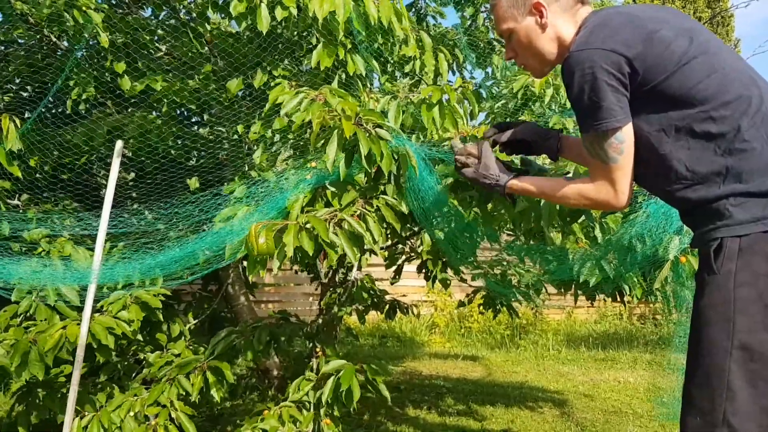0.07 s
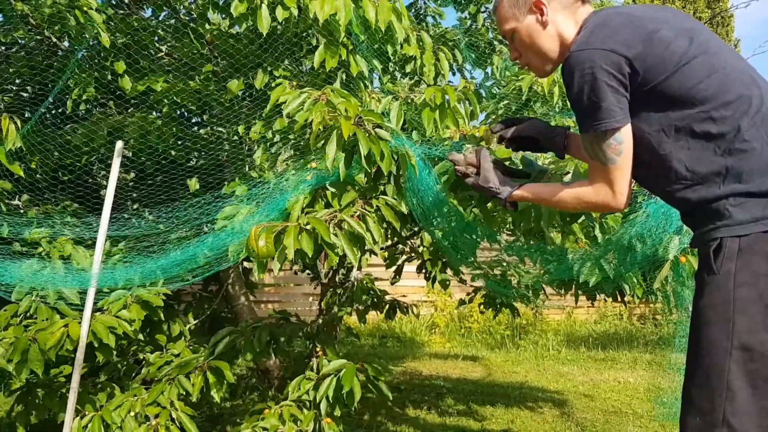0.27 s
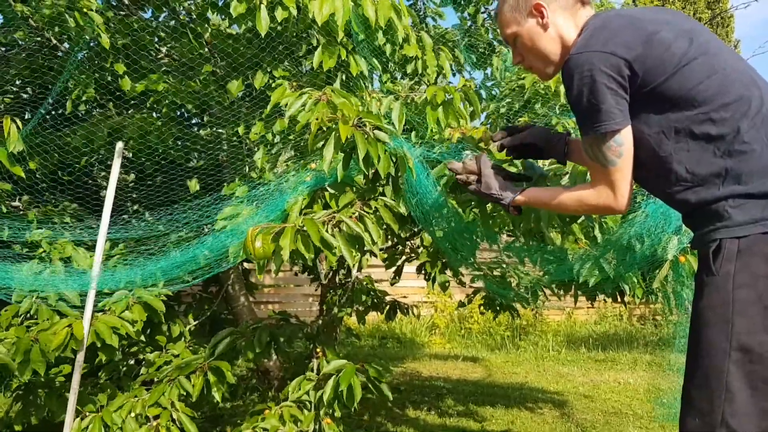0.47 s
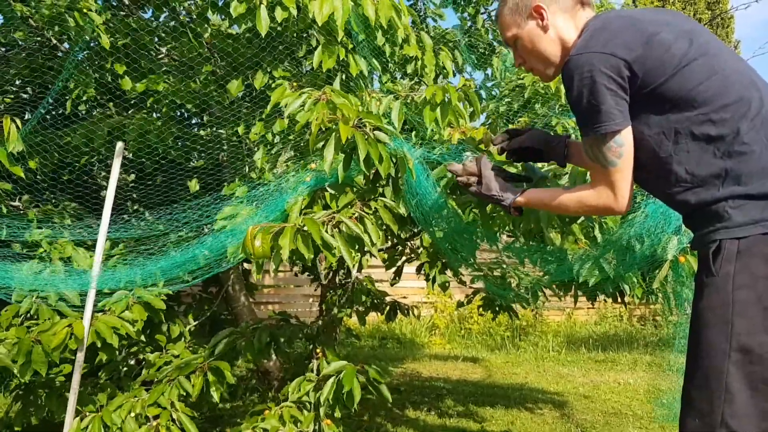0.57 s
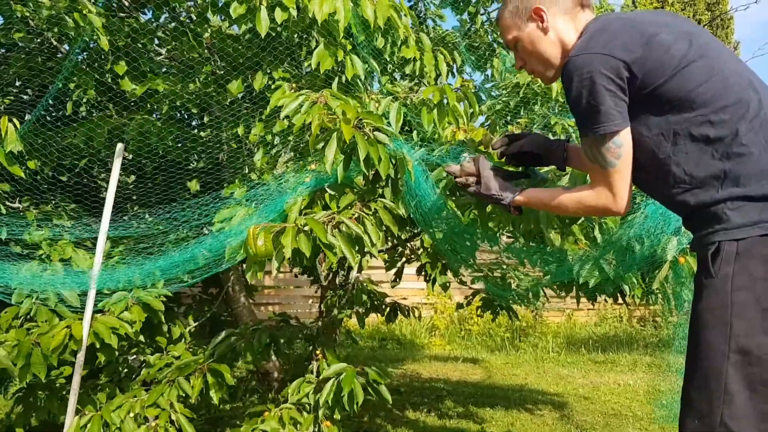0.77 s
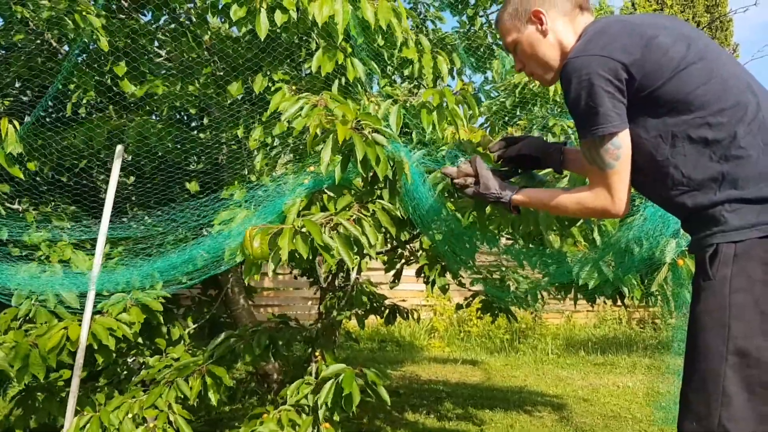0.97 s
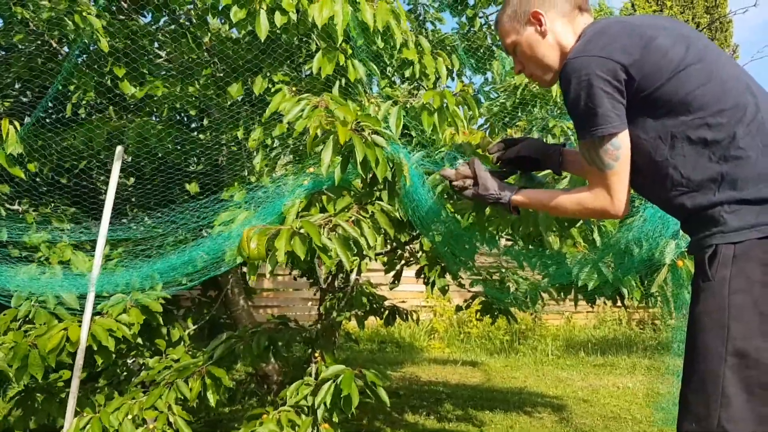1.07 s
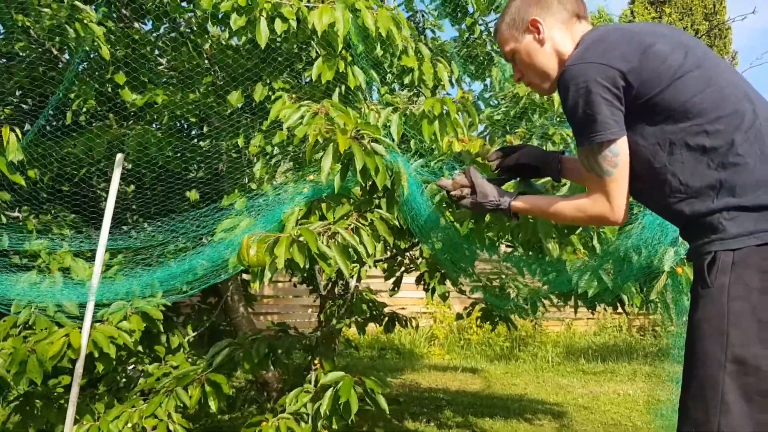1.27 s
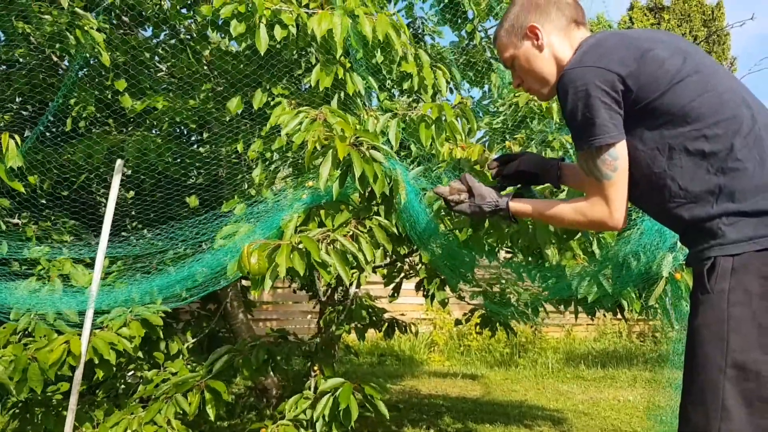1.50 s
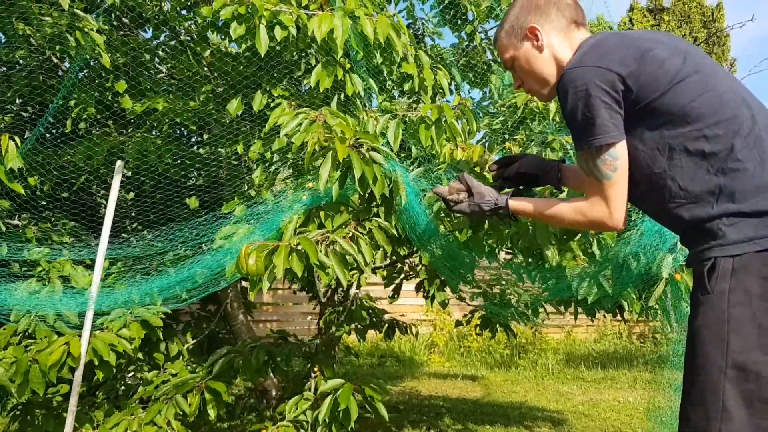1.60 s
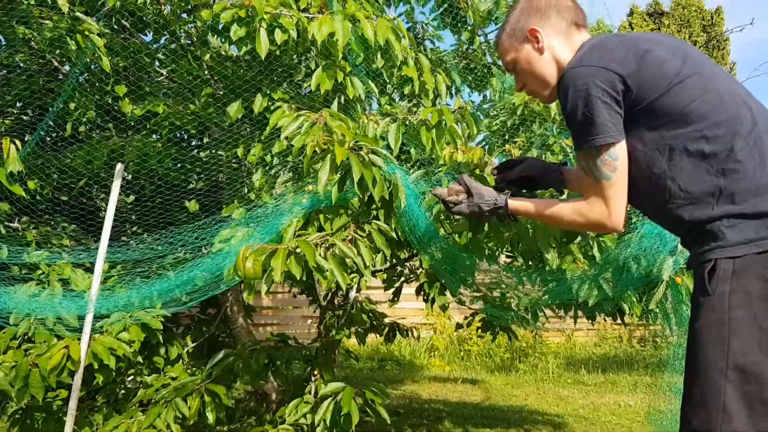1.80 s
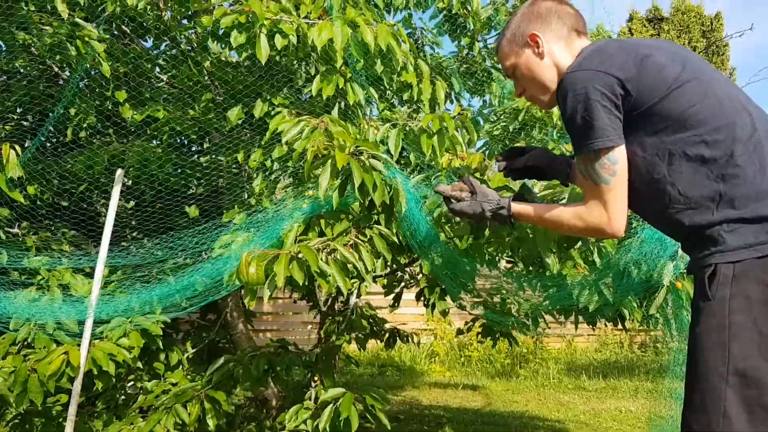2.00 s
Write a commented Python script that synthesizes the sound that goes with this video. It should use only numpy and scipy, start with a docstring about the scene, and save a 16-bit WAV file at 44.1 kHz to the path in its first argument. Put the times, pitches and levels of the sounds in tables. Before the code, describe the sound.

A bird squawks twice, harsh and raspy, at about 0.2 and 0.6 seconds, each call lasting under a fifth of a second with a short echo. Before them, a faint earlier echo fades. Handled netting rustles and bumps softly until about 1 second and again from 1.5 to 1.8. A twig ticks faintly near 1.1 seconds. Quiet leaf hiss and low air rumble on the microphone continue throughout.

```python
"""The echo of a squawk dies away over faint leaf hiss and the rumble of air on the microphone.
Then the bird, caught in garden netting, squawks twice. The two sides of its syrinx sound at once and
modulate each other, so sum tones glide through the throat resonances over a rasp. Trees and a fence
scatter the calls. The net rustles and bumps softly as it is handled, and a twig ticks."""
import sys
import numpy as np
from scipy import signal
from scipy.fft import rfft, irfft, next_fast_len
from scipy.io import wavfile

SR = 44100
rng = np.random.default_rng(int(sys.argv[2]) if len(sys.argv) > 2 else 0)


def store_wav(level_fs):
    """Save 16-bit WAV to argv[1]."""
    pcm = np.round(np.clip(np.atleast_2d(level_fs), -1, 1) * 32767)
    wavfile.write(sys.argv[1], SR, pcm.T.astype(np.int16))


N = 90404
TIME = np.arange(N) / SR
ECHO_DB, ECHO_DELAY_S, ECHO_T60_S = -20, 0.019, 0.31
GARDEN_LIKENESS, NEAR_PAN_DB = 0.067, 4.5

# Vocal effort, one table per squawk. Each row: time in seconds, voice drive in dB, rasp drive in dB.
VOCAL_EFFORT = [
    [(.19, -35.5, -74), (.2, -32.5, -62.5), (.21, -26.5, -53.5), (.232, -21.5, -48.5), (.25, -18, -42),
     (.272, -17, -40), (.287, -21, -36), (.3, -15.5, -36), (.316, -16.5, -38.5), (.338, -15, -35),
     (.358, -19, -37), (.371, -20, -45), (.379, -30, -49.5)],
    [(.567, -34.5, -68), (.578, -28.5, -62.5), (.595, -21, -51), (.625, -20.5, -42.5), (.635, -20, -38),
     (.656, -15.5, -48), (.668, -19, -43), (.679, -23, -39), (.695, -17.5, -49), (.705, -19, -43.5),
     (.716, -19.5, -39.5), (.724, -24, -47), (.733, -36, -43)],
]
# The hollow between the two main resonances, one row per squawk.
# Each row: centre in Hz, half width in Hz, gain in dB.
NOTCHES = [(3760, 160, -31), (3437, 400, -31.5)]


def from_db(db):
    """Amplitude grows tenfold for every 20 dB."""
    return 10 ** (np.asarray(db) / 20)


def rms_one(x):
    """Dividing by the rms gives a signal unit power."""
    return x / np.sqrt(np.mean(x ** 2) + 1e-20)


def in_time(rows):
    """Linear interpolation gives each column of a curve at every sample."""
    seconds, *columns = np.transpose(rows)
    return [np.interp(TIME, seconds, column) for column in columns]


def at_hz(points, hz):
    """A spectrum is interpolated on a logarithmic frequency axis."""
    knots_hz, values = np.transpose(points)
    return np.interp(np.log(np.maximum(hz, 1)), np.log(knots_hz), values)


def filtered(x, response):
    """A linear filter multiplies the spectrum by its response, a function of Hz."""
    size = next_fast_len(x.shape[-1] + SR // 4)
    hz = np.arange(size // 2 + 1) * SR / size
    return irfft(rfft(x, size) * response(hz), size)[..., :x.shape[-1]]


def coloured(x, spectrum):
    """Zero-phase filtering imposes a spectral envelope, given in rows of Hz and dB."""
    return filtered(x, lambda hz: from_db(at_hz(spectrum, hz)))


def drift(corner_hz):
    """Low-passed noise wanders smoothly, here with unit rms."""
    pole = np.exp(-2 * np.pi * corner_hz / SR)
    return rms_one(signal.lfilter([1], [1, -2 * pole, pole * pole], rng.standard_normal(N)))


def stereo_noise(spectrum, likeness):
    """The ratio of side noise to mid noise sets the correlation, or likeness, of two channels."""
    mid, side = rms_one(coloured(rng.standard_normal((2, N)), spectrum))
    return mid + np.sqrt((1 - likeness) / (1 + likeness)) * np.array([side, -side])


def panned(x, pan_db):
    """A level difference between the channels leans a sound to the left."""
    return x * from_db([[pan_db / 2], [-pan_db / 2]])


def dying(start, t60):
    """Exponential decay loses 60 dB every t60 seconds, down to a floor of -120 dB."""
    return (TIME >= start) * from_db(-60 * np.clip((TIME - start) / t60, 0, 2))


def scatter(x, delay, t60):
    """Many small reflections act as a convolution with decaying noise, different in each channel."""
    # Colour of the reflections. Each row: frequency in Hz, gain in dB.
    echo_colour = [(1500, 9.5), (2700, 3), (4600, -2.5), (8000, -2), (14000, 4)]
    tails = rng.standard_normal((2, N)) * dying(delay, t60)
    tails = coloured(rms_one(tails) / np.sqrt(N), echo_colour)
    return signal.fftconvolve(x[None], tails, axes=1)[:, :N]


def opening_echo(ahead_s=0.42, level_db=ECHO_DB - 1.5):
    """Reverberation outlasts its source: only the tail of an earlier squawk is heard."""
    # Syrinx pitch. Each row: time in seconds before the shift by ahead_s, high side in Hz, low side in Hz.
    pitch = [(.19, 2400, 1850), (.27, 2950, 1950), (.32, 2667, 1900), (.38, 2878, 2000)]
    echo = scatter(squawk(pitch, VOCAL_EFFORT[0], NOTCHES[0]), ECHO_DELAY_S, ECHO_T60_S)
    tail = np.array([np.interp(TIME + ahead_s, TIME, channel, right=0) for channel in echo])
    return from_db(level_db) * tail


def leaf_hiss(level_db=-62.5):
    """Many leaves add incoherently to a steady broadband noise."""
    # Each row: frequency in Hz, relative spectral density in dB.
    spectrum = [(25, 0), (55, 3.5), (110, -7.5), (220, -14.5), (450, -12), (900, -16), (1800, -18),
                (2700, -17), (4800, -11.5), (7000, -13.5), (10000, -19.5), (15000, -22)]
    return from_db(level_db) * stereo_noise(spectrum, GARDEN_LIKENESS)


def air_rumble(gain_db=2.5):
    """Air moving over the microphone makes uneven, low-frequency pressure fluctuations."""
    # Each row: time in seconds, relative level in dB.
    swells = [(0.0, -73), (0.11, -80), (0.23, -63), (0.36, -61), (0.45, -62), (0.84, -69), (0.99, -71.5),
              (1.2, -84.5), (1.45, -73.5), (1.69, -66.5), (1.94, -73), (2.05, -78)]
    # Each row: frequency in Hz, relative spectral density in dB.
    spectrum = [(20, -11), (50, 3), (90, 2), (140, -7), (200, -18), (400, -27.5), (900, -40.5), (2500, -54)]
    level_db, = in_time(swells)
    return panned(from_db(level_db + gain_db) * stereo_noise(spectrum, likeness=0.24), NEAR_PAN_DB)


def net_rustle():
    """Friction of net and gloves makes a dull noise that swells and fades."""
    # Each row: time in seconds, level in dB.
    swells = [(0, -87), (.2, -75.5), (.28, -70), (.36, -73.5), (.46, -66), (.58, -66.5), (.68, -64),
              (.82, -70), (.9, -86.5), (1.4, -87), (1.57, -70.5), (1.75, -83.5)]
    # Each row: frequency in Hz, relative spectral density in dB.
    spectrum = [(100, -5), (220, -1), (400, -6), (700, -18), (1500, -26.5), (4000, -46.5)]
    level_db, = in_time(swells)
    return panned(from_db(level_db) * stereo_noise(spectrum, likeness=0.2), NEAR_PAN_DB)


def syrinx(pitch, voice_db, rasp_db):
    """Two coupled oscillators make sum tones. Returns their mix and the phase of the low side."""
    # Each row: multiple of the high side, multiple of the low side.
    tones = [(0, 1), (1, 0), (1, 1), (2, 0), (1, 2), (2, 1), (3, 0), (1, 3), (2, 2), (3, 1), (3, 2), (2, 3),
             (4, 1)]
    # One row per tone. Each row: level at full voice in dB, dB gained per dB of voice drive.
    strengths = [(-43, 1.3), (-24, 0.87), (-23, 1.05), (-28, 1.9), (-36.5, .6), (-35, 0.5), (-46, -0.3),
                 (-38.5, 2), (-35, 1), (-34.5, 3), (-37, 1.4), (-49.5, -0.5), (-44.5, 1.5)]
    full_voice_db, full_rasp_db = -18.5, -38.5
    jitter_hz, shimmer, fading_db_per_order = 22, 0.19, 0.68
    roughness = from_db(0.43 * (rasp_db - full_rasp_db))
    sides_hz = [hz + jitter_hz * roughness * drift(corner_hz=220) for hz in in_time(pitch)]
    high_phase, low_phase = 2 * np.pi * np.cumsum(sides_hz, axis=1) / SR
    voice = 0
    for (m, n), (tone_db, growth) in zip(tones, strengths):
        flutter = 1 + shimmer * roughness * (drift(corner_hz=223) + 1j * drift(corner_hz=223))
        # Tones come and go, the higher orders more.
        fading_db = fading_db_per_order * (m + n - 1) * drift(corner_hz=43)
        amplitude = from_db(tone_db + fading_db + growth * (voice_db - full_voice_db))
        voice += amplitude * np.real(flutter * np.exp(1j * (m * high_phase + n * low_phase)))
    return voice, low_phase


def rasp(low_phase, pulsing=0.51):
    """Turbulence in the throat is amplitude-modulated by the low side of the syrinx."""
    # Each row: frequency in Hz, relative spectral density in dB.
    spectrum = [(700, -40.5), (1400, -36.5), (1750, -13), (2030, -29), (2350, -9), (2750, -5.5),
                (3300, -7.5), (4200, -2.5), (4700, -4), (5500, -2), (7500, -2.5), (9800, -8.5),
                (12000, -10.5), (13800, -9), (15000, -31)]
    pulsed_air = rng.standard_normal(N) * (1 + pulsing * np.cos(low_phase))
    return rms_one(coloured(pulsed_air, spectrum))


def squawk(pitch, effort, notch, attack_s=0.003, release_s=0.00524, rasp_gain_db=10):
    """Source and filter: throat resonances shape the voice, rasp joins it, and a notch hollows both."""
    # Resonances of the throat and open beak. Each row: frequency in Hz, gain in dB.
    throat = [(1500, -10.5), (1850, 1.5), (2050, -8), (2280, 2), (2620, 2), (2900, -3), (3400, 0),
              (4050, 2), (4350, 0.5), (4700, 8.5), (5200, 1), (6000, 1.5), (7200, -3), (8400, 3.5),
              (10500, -3.5), (14000, -2)]
    voice_db, rasp_db = in_time(effort)
    start, end = effort[0][0], effort[-1][0]
    gate = np.clip((TIME - start) / attack_s + 1, 0, 1) * np.clip((end - TIME) / release_s + 1, 0, 1)
    voice, low_phase = syrinx(pitch, voice_db, rasp_db)
    air = from_db(rasp_db + rasp_gain_db) * rasp(low_phase)
    call = coloured(gate * voice, throat) + gate * air
    centre, width, depth_db = notch
    return filtered(call, lambda hz: from_db(depth_db * np.exp(-((hz - centre) / width) ** 4)))


def ports(x):
    """Direct sound reaches the two microphone ports with differences of phase and level."""
    # Each row: frequency in Hz, phase lead of the left port in radians.
    phase_lead = [(100, -1.5), (2300, 0.1), (3000, -0.2), (3400, 4.5), (4100, 4.5), (4700, 5), (5600, 6.5),
                  (7000, 8), (7700, 7.5), (8600, 10.5), (10000, 10.5), (11200, 14.5), (14000, 14)]
    # Each row: frequency in Hz, left level minus right level in dB.
    balance = [(2000, -0.5), (5600, 0.5), (6600, 4), (7600, -4.5), (8400, 10), (10000, -4), (11500, 1)]

    def left(hz):
        return from_db(at_hz(balance, hz) / 2) * np.exp(0.5j * at_hz(phase_lead, hz))
    return np.array([filtered(x, left), filtered(x, lambda hz: 1 / left(hz))])


def bird(near_db=-16):
    """Two squawks arrive by several paths: directly, off nearby leaves, and off trees and fence."""
    # Syrinx pitch, one table per squawk. Each row: time in seconds, high side in Hz, low side in Hz.
    pitches = [
        [(.188, 2260, 1851), (.197, 2382, 1793), (.218, 2266, 1860), (.232, 2332, 1845), (.242, 3268, 1631),
         (.249, 2949, 1863), (.268, 2854, 1822), (.281, 2452, 1787), (.298, 2499, 1743), (.308, 3220, 1572),
         (.315, 3574, 1516), (.331, 2748, 1693), (.343, 2620, 1644), (.351, 2643, 1650), (.359, 2910, 1781),
         (.368, 2747, 1790), (.38, 2473, 1600)],
        [(.565, 2354, 1680), (.574, 2355, 1635), (.588, 2215, 1683), (.602, 2200, 1763), (.62, 2295, 1706),
         (.632, 2392, 1681), (.64, 2854, 1850), (.652, 2668, 1879), (.66, 2728, 1850), (.669, 2669, 1866),
         (.683, 2386, 1853), (.693, 2377, 1835), (.709, 2898, 1810), (.72, 2848, 1713), (.734, 2483, 1700)],
    ]
    calls = sum(squawk(*call) for call in zip(pitches, VOCAL_EFFORT, NOTCHES))
    far = scatter(calls, ECHO_DELAY_S, ECHO_T60_S)
    near = scatter(calls, delay=0, t60=0.11)
    return ports(calls) + from_db(near_db) * near + from_db(ECHO_DB) * far


def net_bumps(right_lag_rad=0.97):
    """Each soft bump of the handled net is a damped oscillation that builds up within two cycles."""
    # Each row: start in seconds, level in dB, frequency in Hz, time to decay by 60 dB in seconds.
    knocks = [(.268, -40, 75.3, 0.14), (0.274, -54, 243, 0.11), (.352, -39, 88, 0.06),
              (0.419, -44.5, 115, 0.13), (0.461, -49.5, 170, 0.05), (.52, -41.5, 136, 0.074),
              (.543, -44.5, 418, .035), (.774, -36.5, 102, 0.091), (0.811, -40, 83, 0.065),
              (0.943, -43, 97.5, .07), (1.544, -45.5, 80, 0.11), (1.656, -44.5, 54.8, 0.11),
              (1.831, -46, 88.7, .1)]
    lag = np.array([[0], [right_lag_rad]])
    bumps = 0
    for start, db, hz, t60 in knocks:
        envelope = from_db(db) * dying(start, t60) * (1 - dying(start, 2 / hz))
        bumps += envelope * np.sin(2 * np.pi * hz * (TIME - start) - lag)
    return panned(bumps, NEAR_PAN_DB)


def twig_tick(level_db=-54):
    """A brief transient has a broad spectrum: the twig gives a bright, quickly damped burst of noise."""
    # Each row: frequency in Hz, relative spectral density in dB.
    spectrum = [(1500, -20), (5000, 3), (11000, -1), (15000, -16)]
    return from_db(level_db) * dying(start=1.076, t60=0.025) * stereo_noise(spectrum, GARDEN_LIKENESS)


def scene():
    """The sounds of bird, net and garden add by superposition."""
    return opening_echo() + leaf_hiss() + air_rumble() + net_rustle() + bird() + net_bumps() + twig_tick()


def record(dry, cutoff_hz=15500):
    """An elliptic low-pass filter cuts the top of the spectrum steeply."""
    return signal.sosfilt(signal.ellip(12, 0.1, 80, cutoff_hz, fs=SR, output="sos"), dry)


dry = scene()
out = record(dry)
store_wav(out)
```